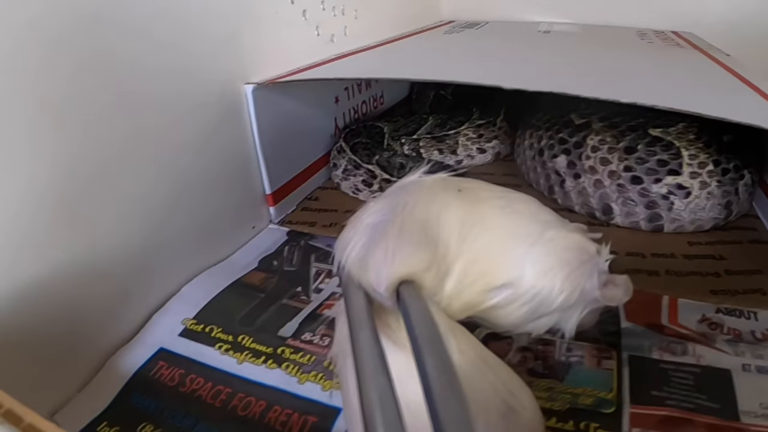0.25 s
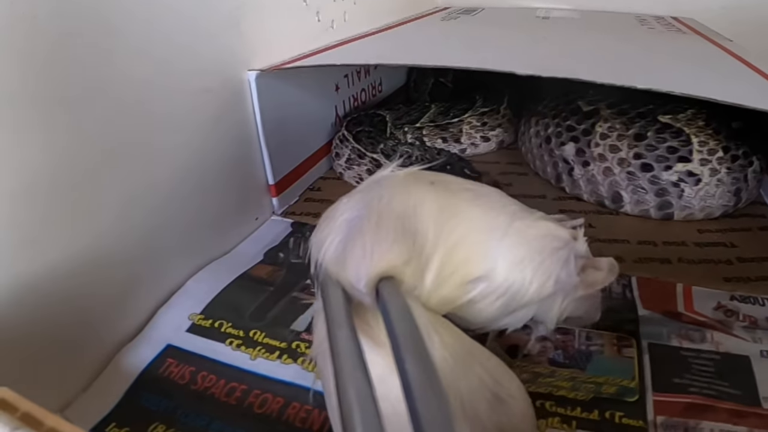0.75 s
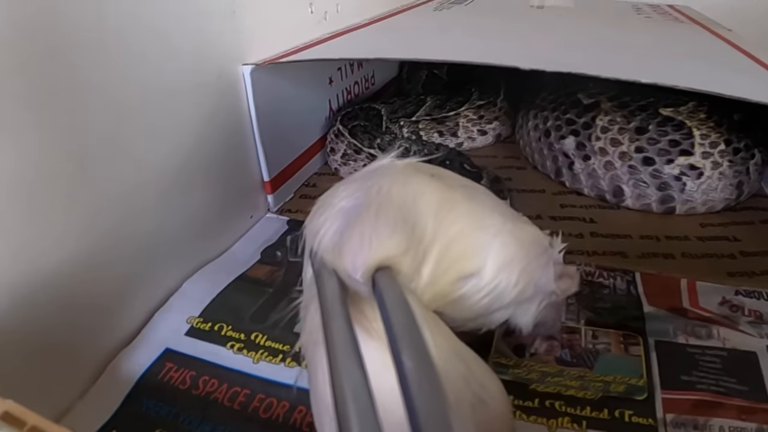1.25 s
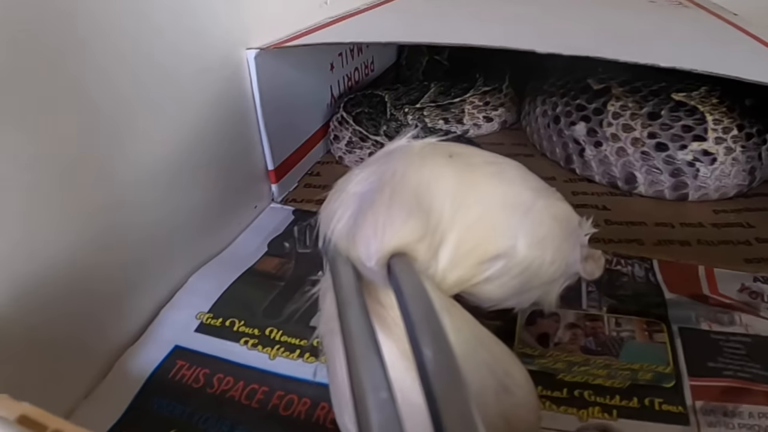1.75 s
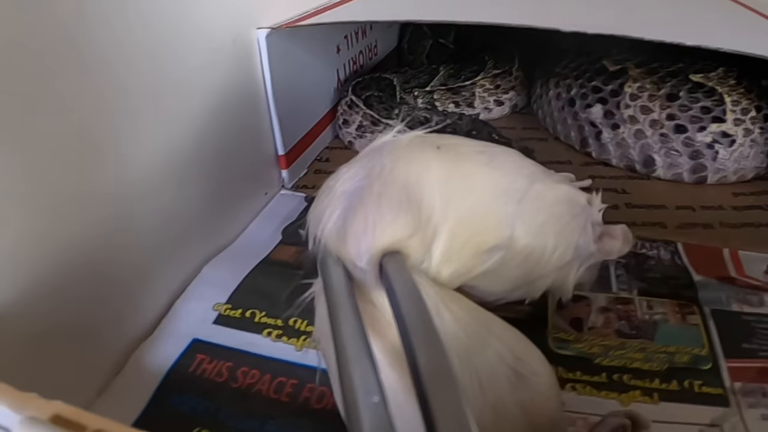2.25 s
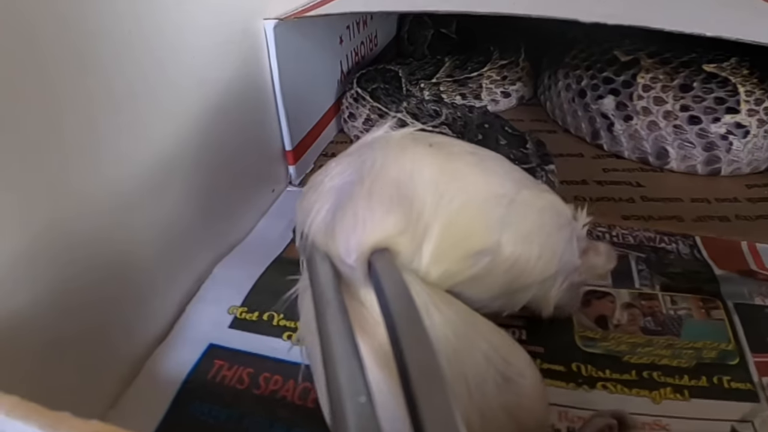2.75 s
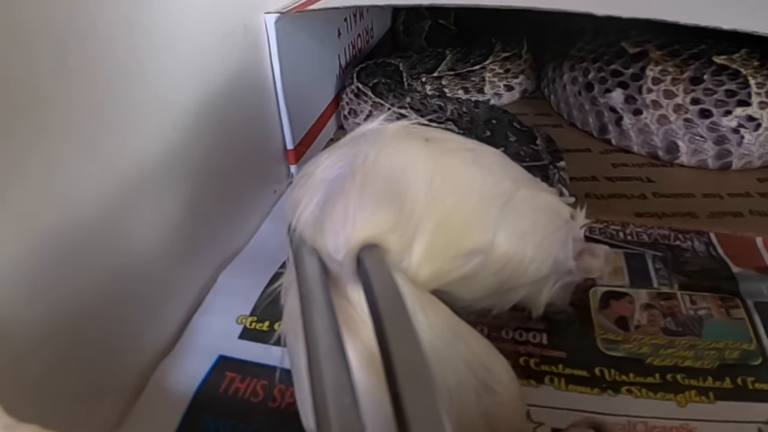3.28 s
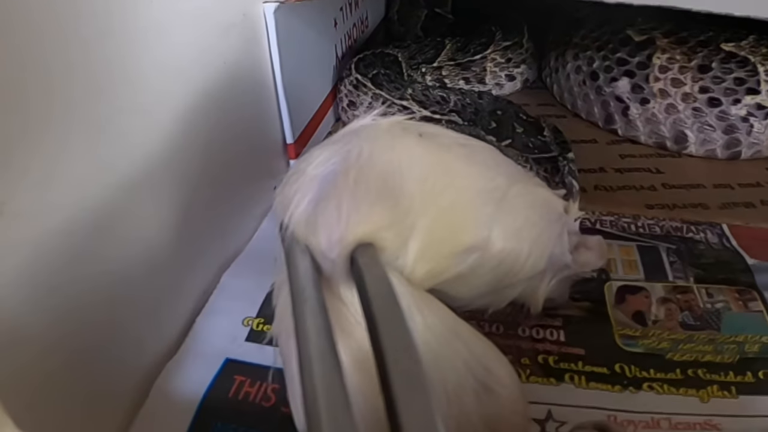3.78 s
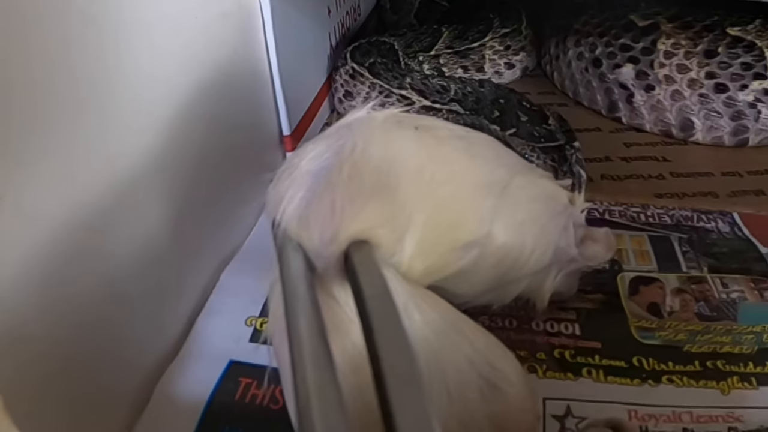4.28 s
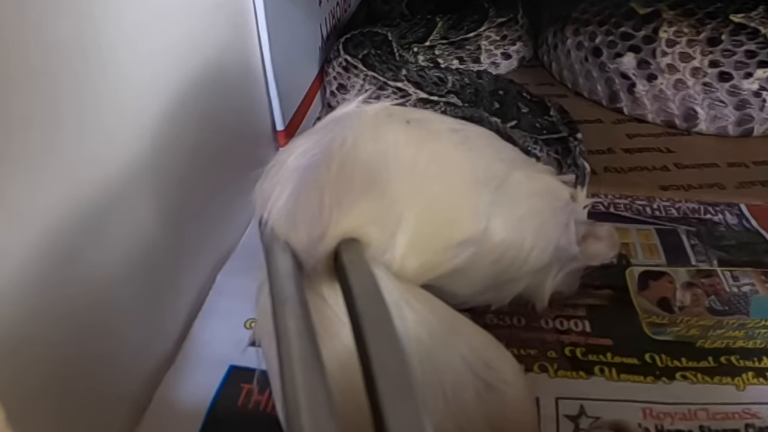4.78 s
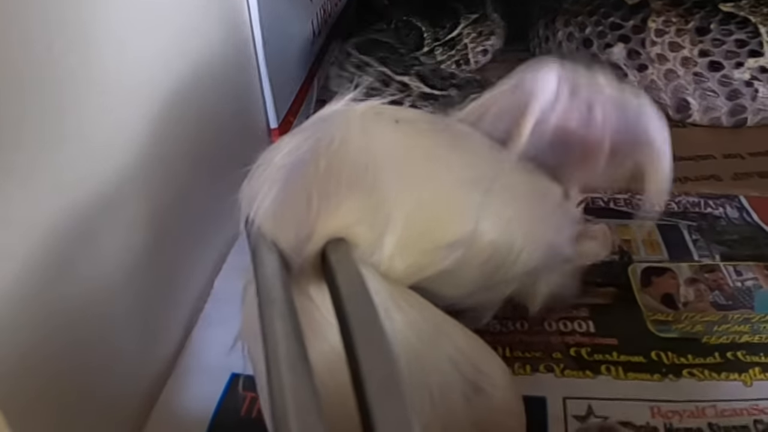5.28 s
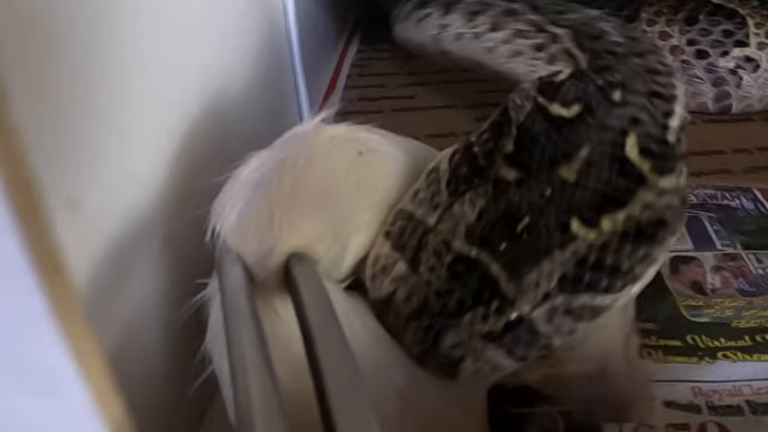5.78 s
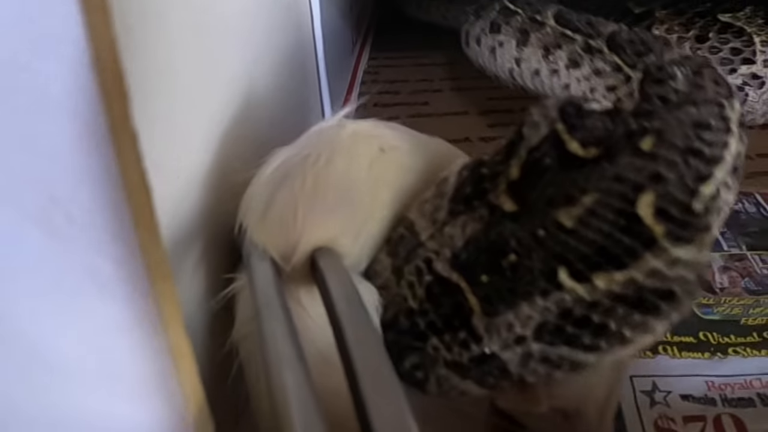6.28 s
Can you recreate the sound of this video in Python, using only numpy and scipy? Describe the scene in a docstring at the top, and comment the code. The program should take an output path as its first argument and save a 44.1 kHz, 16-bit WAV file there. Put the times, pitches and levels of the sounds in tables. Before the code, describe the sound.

Everything is close, dry and dull, in one channel, with a thin steady hiss underneath, like slowed-down handling noise. From 0 s fur and paper rub softly, with low bumps along the tongs and hand jolts as deep thuds or barely audible shaking. Small hollow ticks come irregularly, clearer at 0.4, 1.6, 2.2 and 2.5 s. The rustle sinks near 1.3 s, swells around 2.2 s with the strongest jolt at 2.3 s, then fades. At 2.7 s a faint soft hum rises quickly and dies away within about a second. Near 3 s it is quietest; rustle returns with the strongest ticks at 3.8 and 3.95 s, then quieter rubbing, ticks and thuds continue to 6 s. From about 6.1 s loud rough rustling surges. A crack and low lurch come at 6.36 s, then dense sharp snaps and a brief harsh scrape around 6.5 s, peaking hard against the limiter, ending abruptly.

```python
"""Slow-motion snake strike

Low, dull sounds, as in slow motion: tongs carry a rat and a small camera towards a snake in a cardboard box.
Fur and paper rustle as coloured friction noise on level curves; the tongs shake, bump and tick.
The snake strikes and drags the rat over the paper with cracks and a scrape, loud enough to drive the
recorder's limiter. A faint hum swells and dies once; a steady hiss lies under it all."""
import sys
import numpy as np
from scipy import signal
from scipy.io import wavfile
from scipy.ndimage import uniform_filter1d, minimum_filter1d

SR = 44100
rng = np.random.default_rng(int(sys.argv[2]) if len(sys.argv) > 2 else 0)


def wav_record(signal):
    """Record a signal, one row per channel, as 16-bit PCM in the file named by sys.argv[1]."""
    frames = np.transpose(np.atleast_2d(signal))
    bounded = np.clip(frames, -1, 1)
    # unit amplitude maps onto the largest positive 16-bit level
    quanta = np.round(bounded * 32767).astype(np.int16)
    wavfile.write(sys.argv[1], SR, quanta)


N = 287973  # length in samples

# Rubbing of fur and paper while the tongs move in.
# Each row: time in seconds, bright rustle in dB, middle rustle in dB above the bright.
RUBBING = [(0.0, -41.5, -3.5), (0.06, -43.5, -6), (0.12, -46.5, 1), (0.4, -36.5, -1.5), (0.62, -43, 1.5),
           (1.35, -50.5, 5.5), (1.52, -42.5, -0.5), (1.54, -44, 3), (1.59, -41, -1.5), (1.67, -36.5, -4),
           (2.1, -35.5, 0), (2.22, -30.5, -1), (2.64, -41, -1.5), (3.01, -54.5, 4), (3.19, -42, -6),
           (3.69, -37, -3), (3.86, -32, -4), (4.68, -36.5, -3.5), (5.21, -45.5, -3), (6.0, -40.5, -4)]
# The strike and the drag. Each row: time in seconds, bright rustle in dB, then middle rustle,
# rumble and deep rumble, each in dB above the bright.
DRAGGING = [(6.02, -39.5, 2, 0, 3), (6.132, -24.5, -7, -9.5, -5), (6.19, -13, -3, -7.5, -15.5),
            (6.298, -14.5, -0.5, -6, -6), (6.314, -13, -3, -3.5, -19), (6.362, -21, 4, 13, 10),
            (6.42, -14, -3.5, -11, -5), (6.444, -19, 0.5, -3, -3), (6.482, -5, -9.5, -6, -16),
            (6.53, -17.5, 3.5, 3, -2)]
# Harsh scrape as the rat is dragged. Each row: time in seconds, level in dB.
SCRAPE_LEVEL = [(6.36, -51), (6.394, -55), (6.4, -51.5), (6.465, -52), (6.495, -26), (6.504, -38.5),
                (6.53, -35)]
# Sharp snaps. Each row: time in seconds, body level in dB, top treble in dB above the body.
SNAP_HITS = [(6.356, -22.5, -16), (6.4016, -38, -30), (6.4091, -31.5, -30), (6.4236, -27, -30),
             (6.4268, -42, -33), (6.439, -40, -31), (6.445, -37, -30), (6.455, -38, -29), (6.462, -39, -28),
             (6.4771, -22, -25), (6.482, -20.5, -19), (6.4859, -12, -27), (6.4912, -26, -26),
             (6.4955, -13.5, -25.5), (6.4984, -26.5, -28), (6.4987, -29, -30), (6.507, -27, -27),
             (6.5106, -37, -31), (6.5176, -27.5, -25), (6.5208, -24, -28)]
# Small ticks of the tongs and the paper. Each row: time in seconds, peak level in dB.
TICK_HITS = [(0.055, -34), (0.234, -35), (0.39, -25.5), (0.52, -28), (0.762, -31), (0.944, -34),
             (1.452, -35), (1.594, -20.5), (2.19, -24.5), (2.46, -31), (2.527, -24.5), (3.058, -34.5),
             (3.574, -32), (3.809, -20.5), (3.958, -18.5), (4.285, -27), (4.491, -30), (4.757, -38),
             (4.863, -31), (5.03, -31.5), (5.173, -34), (5.626, -32), (5.716, -25.5), (5.877, -22)]
# Soft bumps on the tongs. Each row: time in seconds, level in dB.
TONG_BUMPS = [(0.02, -36.5), (.4, -34), (1.42, -39), (2.09, -32), (2.26, -36), (2.39, -38), (2.7, -38),
              (3.46, -46), (3.83, -42.5), (4.19, -36.5), (4.64, -39.5), (5.0, -35), (5.39, -54),
              (5.63, -47)]
# Jolts of the hand. Each row: time in seconds, shake level in dB, deep thud level in dB.
HAND_JOLTS = [(.42, -15, -30), (.53, -14.5, -36), (.77, -16.5, -35), (0.968, -18, -43), (1.75, -16, -38.5),
              (2.3, -4, -27), (2.579, -10.5, -40), (2.849, -20, -34), (3.47, -25, -31), (3.93, -15, -35.5),
              (4.098, -14.5, -34), (4.33, -17, -35.5), (4.501, -15, -43), (4.72, -29, -38),
              (5.0, -24, -38.5), (5.36, -11.5, -38), (5.73, -17.5, -38), (6.05, -17, -33),
              (6.251, -12.5, -39), (6.42, -14, -36.5)]

# Colours; only their shape counts, since levels are set elsewhere.
# Bright range of the rustle. Each row: frequency in Hz, gain in dB.
BRIGHT_COLOUR = [(250, -30.5), (500, -12), (700, -4), (835, 2), (950, -9.5), (1270, -28.5), (1550, -39),
                 (1750, -49.5), (3000, -65.5), (5000, -75), (12000, -112)]
# Middle range of the rustle. Each row: frequency in Hz, gain in dB.
MIDDLE_COLOUR = [(90, -29.5), (170, -4), (230, 0.5), (300, 2), (390, 4.5), (500, -2.5), (700, -13.5),
                 (1200, -75), (3000, -102), (8000, -130)]
# Scrape. Each row: frequency in Hz, gain in dB.
SCRAPE_COLOUR = [(900, -20), (1600, 5.5), (2500, -11.5), (4000, -24.5), (7000, -33), (15000, -62.5)]
# Body of a snap. Each row: frequency in Hz, gain in dB.
SNAP_COLOUR = [(700, -18), (1300, 3), (1700, 7), (2050, -2), (2500, -0.5), (4200, -19), (6000, -30.5),
               (12000, -67)]
# Top treble of a snap. Each row: frequency in Hz, gain in dB.
SNAP_TOP_COLOUR = [(3500, -44.5), (5500, -2), (7000, 1.5), (10000, -9), (15000, -11.5)]
# Ring of a tick. Each row: frequency in Hz, gain in dB.
TICK_COLOUR = [(200, -23), (500, -1.5), (780, 10.5), (950, -2), (1300, -41.5), (2000, -73), (6000, -110)]
# Rumble of bumps and drag. Each row: frequency in Hz, gain in dB.
RUMBLE_COLOUR = [(30, -24), (60, 3.5), (90, 3), (120, 1), (170, -1), (300, -19), (800, -88.5), (3000, -130)]
# Deep rumble and thuds. Each row: frequency in Hz, gain in dB.
DEEP_COLOUR = [(10, -26), (22, 3), (35, 14.5), (55, -7.5), (90, -23.5), (250, -70), (1500, -140)]
# Shake of the hand. Each row: frequency in Hz, gain in dB.
SHAKE_COLOUR = [(1, -7.5), (3, 2.5), (8, 1.5), (14, -10.5), (22, -42), (40, -47), (100, -102), (500, -160)]
# Recorder hiss. Each row: frequency in Hz, gain in dB.
HISS_COLOUR = [(1000, 15.5), (2500, 1.5), (5000, -2), (10000, -2), (16000, -2.5)]

# each tick drags a short scuff of rustle with it, set relative to the tick
SCUFF_DB, SCUFF_RISE_DB_PER_S, SCUFF_FALL_DB_PER_S = -12, 603, 350
# loose grit round each snap, and the times its lead-in and tail take to change by 60 dB
GRIT_DB, GRIT_LEAD_T60_S, GRIT_TAIL_T60_S = -19, 0.0037, 0.011
# each low range at the mean rubbing level, and the share of the rubbing's dB swings that it follows
RUB_MEAN_DB = -39
RUMBLE_DB, RUMBLE_FOLLOWS = -44.5, 0.23
DEEP_DB, DEEP_FOLLOWS = -44, 0.33
BUMP_RISE_DB_PER_S, BUMP_FALL_DB_PER_S = 309.5, 147.5
JOLT_RISE_DB_PER_S, SHAKE_FALL_DB_PER_S, THUD_FALL_DB_PER_S, SHAKE_REST_DB = 151, 76, 58.5, -26
TONE_S, TONE_HZ, TONE_DB = 2.73, 335, -40.5  # moment of the peak, pitch, peak level
TONE_RISE_DB_PER_S, TONE_FALL_DB_PER_S = 398, 59.5
STEP_S = 0.005  # time grid of the level curves
CEILING, HISS_DB, EDGE_HZ = 1, -71, 15750  # limiter peak, hiss level, band limit


def rustle():
    """One rubbing force heard in two ranges; the microphone port rings at the top of the bright one."""
    strike = np.array(DRAGGING)[:, :3]
    s, bright_db, middle_db = np.transpose(np.r_[RUBBING, strike])
    tick_s, tick_db = np.transpose(TICK_HITS)
    rub = grainy(per_s=500, spread_db=3.0, share=0.2)
    scuffed = peaked(np.c_[s, bright_db], tick_s, tick_db + SCUFF_DB, SCUFF_RISE_DB_PER_S, SCUFF_FALL_DB_PER_S)
    bright = played(scuffed, colour(rub, BRIGHT_COLOUR), steady_s=0.13)
    middle = played(np.c_[s, bright_db + middle_db], colour(rub, MIDDLE_COLOUR), steady_s=0.47)
    return bright + middle


def scrape():
    """Dense slips of scales and fur on paper."""
    slips = grainy(per_s=1900, spread_db=8.0, share=0.72)
    return played(SCRAPE_LEVEL, colour(slips, SCRAPE_COLOUR), steady_s=0.02)


def snaps():
    """Hard cracks, each with its own share of top treble; grit briefly leads in and rattles on a little longer."""
    s, db, top_db = np.transpose(SNAP_HITS)
    t = np.arange(-400, 401) / SR
    t60 = np.where(t < 0, GRIT_LEAD_T60_S, GRIT_TAIL_T60_S)
    grit = gain_of(GRIT_DB - 60 * abs(t) / t60)
    body = struck(s, db, SNAP_COLOUR, grit)
    top = struck(s, db + top_db, SNAP_TOP_COLOUR, grit)
    return body + top


def ticks():
    """Each tick is a single dull blow that rings the microphone port."""
    s, db = np.transpose(TICK_HITS)
    return struck(s, db, TICK_COLOUR)


def rumble():
    """Soft bumps and drag along the tongs, as low friction noise; each jolt adds a deep thud."""
    _, drag_db, _, rumble_db, deep_db = np.transpose(DRAGGING)
    jolt_s, _, thud_db = np.transpose(HAND_JOLTS)
    bump_s, bump_db = np.transpose(TONG_BUMPS)
    drag = grainy(per_s=140, spread_db=3.5, share=0.15)
    low_level = following(RUMBLE_DB, RUMBLE_FOLLOWS, drag_db + rumble_db)
    low_level = peaked(low_level, bump_s, bump_db, BUMP_RISE_DB_PER_S, BUMP_FALL_DB_PER_S)
    deep_level = following(DEEP_DB, DEEP_FOLLOWS, drag_db + deep_db)
    deep_level = peaked(deep_level, jolt_s, thud_db, JOLT_RISE_DB_PER_S, THUD_FALL_DB_PER_S)
    low = played(low_level, colour(drag, RUMBLE_COLOUR), steady_s=0.063)
    deep = played(deep_level, colour(drag, DEEP_COLOUR), steady_s=0.21)
    return low + deep


def shake():
    """The hand's tremor reaches the microphone through the tongs, mostly below hearing; jolts swell it."""
    s, db, _ = np.transpose(HAND_JOLTS)
    level = peaked([(0, SHAKE_REST_DB)], s, db, JOLT_RISE_DB_PER_S, SHAKE_FALL_DB_PER_S)
    return played(level, colour(rng.standard_normal(N), SHAKE_COLOUR), steady_s=0.17)


def tone():
    """A faint soft hum: one sine that swells quickly and dies more slowly."""
    t = np.arange(N) / SR - TONE_S
    db = TONE_DB + np.where(t < 0, TONE_RISE_DB_PER_S, -TONE_FALL_DB_PER_S) * t
    return gain_of(db) * np.sin(2 * np.pi * TONE_HZ * t)


def grainy(per_s, spread_db, share):
    """Smooth friction noise mixed with separate slips, a few of them large; share is the slips' power."""
    sizes = gain_of(spread_db * np.minimum(rng.exponential(1, N), 4))
    happens = rng.random(N) < per_s / SR
    slips = evened(sizes * happens * rng.choice([-1., 1.], N))
    return np.sqrt(share) * slips + np.sqrt(1 - share) * rng.standard_normal(N)


def struck(s, db, points, grit=0):
    """Blows at the times s ring a body of the given colour, its peak set by db; grit shapes noise round each."""
    blows, click = np.zeros(N), np.zeros(4096)
    blows[np.round(s * SR).astype(int)] = gain_of(db)
    grit_level = signal.fftconvolve(blows, np.atleast_1d(grit), "same")
    blows = blows + grit_level * rng.standard_normal(N)
    click[0] = 1
    ring = colour(click, points)
    return signal.fftconvolve(blows, ring / abs(ring).max())[:N]


def played(rows, sound, steady_s):
    """Puts a sound on a (s, dB) curve, near silent before it; its own swells slower than steady_s are evened."""
    s, db = np.transpose(rows)
    width = round(steady_s * SR)
    power = uniform_filter1d(uniform_filter1d(sound ** 2, width), width)
    own = np.sqrt(abs(power))
    level = gain_of(np.interp(np.arange(N) / SR, s, db, left=-120))
    level = uniform_filter1d(level, size=132)  # 3 ms
    return level * sound / (own + 0.053 * own.mean())  # the small floor spares the quiet gaps


def following(rest_db, share, drag_db):
    """Level rows (s, dB): a share of the rubbing's swings about rest_db, then the drag's own level."""
    s, db, _ = np.transpose(RUBBING)
    approach = np.c_[s, rest_db + share * (db - RUB_MEAN_DB)]
    drag = np.c_[np.transpose(DRAGGING)[0], drag_db]
    return np.r_[approach, drag]


def peaked(rows, s, db, rise_db_per_s, fall_db_per_s):
    """Adds to the level rows, as power, a quick rise and a slower fall around each (s, db)."""
    t = np.arange(0, N / SR + STEP_S, STEP_S)
    late = t[:, None] - s
    peaks = db + np.where(late < 0, rise_db_per_s, -fall_db_per_s) * late
    base_power = gain_of(2 * np.interp(t, *np.transpose(rows)))
    power = base_power + gain_of(2 * peaks).sum(axis=1)
    return np.c_[t, 10 * np.log10(power)]


def colour(x, points):
    """Causal minimum-phase filter whose gain follows the (Hz, dB) points along log frequency."""
    size = 2 ** 16
    hz, db = np.transpose(points)
    bins_hz = abs(np.fft.fftfreq(size, 1 / SR))
    gain_db = np.interp(np.log(bins_hz + 1), np.log(hz + 1), db)
    log_gain = np.log(gain_of(gain_db))
    response = np.exp(np.conj(signal.hilbert(log_gain)))
    taps = np.fft.ifft(response).real[:size // 2]
    return signal.fftconvolve(x, taps)[:len(x)]


def gain_of(db):
    """Amplitude factor for a level in dB."""
    return 10 ** (np.asarray(db) / 20)


def evened(x):
    """Scales a signal to an RMS of one."""
    return x / np.sqrt(np.mean(x ** 2) + 1e-20)


def scene():
    """All sources, mixed to one channel."""
    strike = rustle() + scrape() + snaps()
    tongs = ticks() + rumble() + shake()
    return (strike + tongs + tone())[None]


def record(dry):
    """A quick limiter holds the peaks near the ceiling; then the recorder's own hiss and the band limit."""
    allowed = np.minimum(1, CEILING / (abs(dry[0]) + 1e-9))
    held = minimum_filter1d(allowed, size=441)  # 10 ms
    gain = uniform_filter1d(uniform_filter1d(held, size=220), size=220)
    hiss = gain_of(HISS_DB) * evened(colour(rng.standard_normal(N), HISS_COLOUR))
    band_limit = signal.firwin(1023, EDGE_HZ, window=("kaiser", 9), fs=SR)
    return signal.oaconvolve(dry * gain + hiss, band_limit[None], "same")


dry = scene()
out = record(dry)
wav_record(out)
```